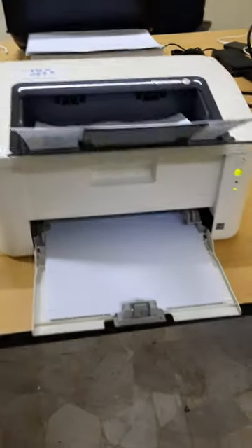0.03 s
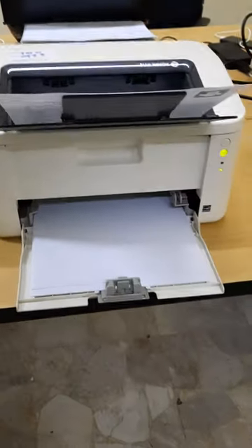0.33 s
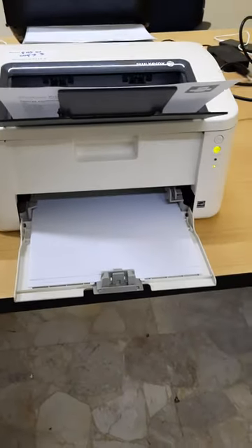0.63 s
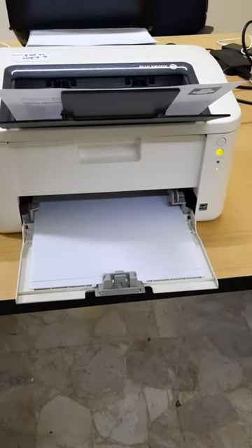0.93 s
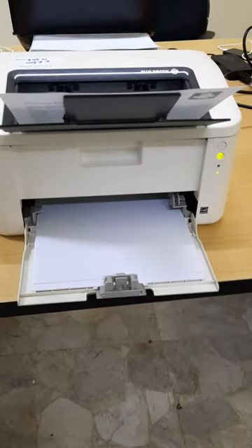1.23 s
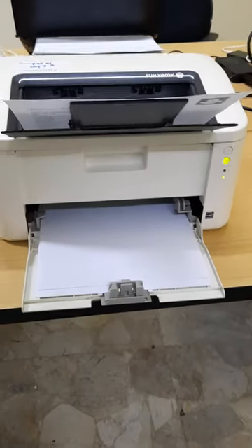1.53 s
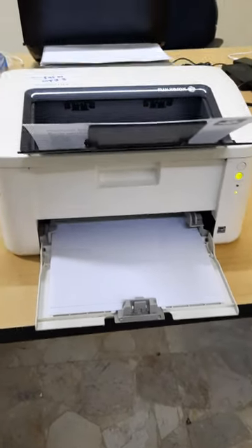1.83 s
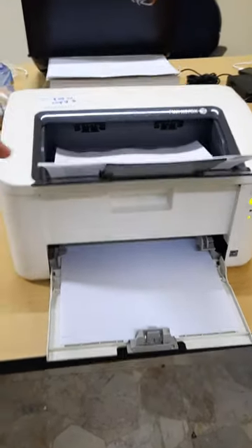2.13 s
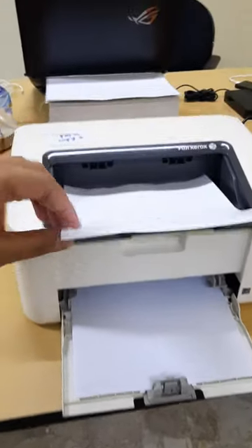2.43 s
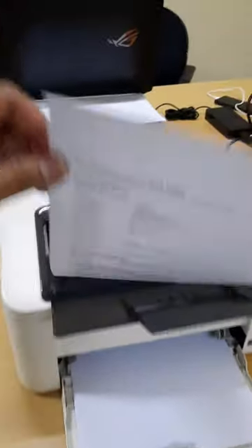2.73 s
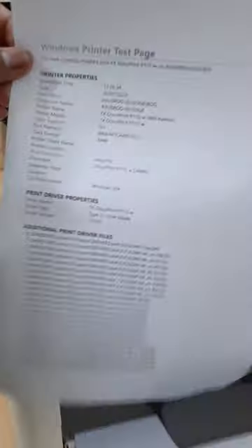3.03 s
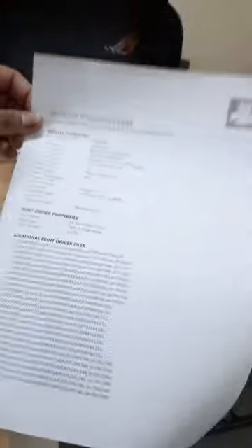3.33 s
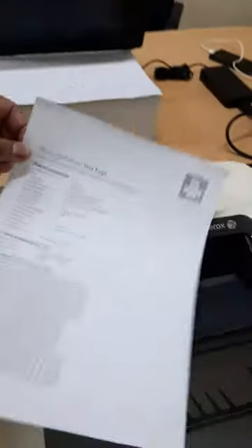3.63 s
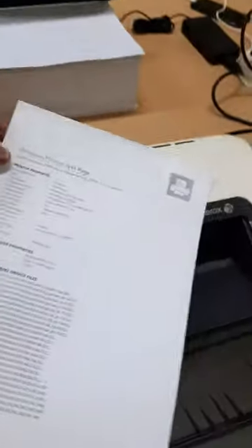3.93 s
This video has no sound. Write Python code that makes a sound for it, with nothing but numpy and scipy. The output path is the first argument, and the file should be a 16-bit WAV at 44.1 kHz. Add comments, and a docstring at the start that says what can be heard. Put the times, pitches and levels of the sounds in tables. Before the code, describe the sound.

A printer motor whines down, then a sheet of paper slides out and rustles.

```python
"""A small room, a stereo pair of microphones by a laser printer that has just finished, over a low rumble.
From the start its scanner motor coasts down, whining through the resonances of the plastic housing,
and a plastic part ticks. From 1.6 s an arm reaches in with soft swishes and the fingers grip the sheet
with a thin squeak. The paper hisses as it drags over the tray; from about 2.8 s it lifts clear,
buckling, flapping and crinkling, while the rumble grows."""
import sys
import numpy as np
from scipy import signal
from scipy.fft import rfft, irfft, next_fast_len
from scipy.io import wavfile
from scipy.ndimage import uniform_filter1d, map_coordinates

SR = 44100
rng = np.random.default_rng(int(sys.argv[2]) if len(sys.argv) > 2 else 0)


def unload_audio(sound):
    """Save the sound as a 16-bit wav file, at the path given as the first command line argument."""
    columns = np.transpose(np.atleast_2d(sound))
    # keep every value between -1 and 1, then stretch to whole-number steps
    steps = np.round(np.clip(columns, -1, 1) * 32767)
    wavfile.write(sys.argv[1], SR, steps.astype(np.int16))


N = 176400


def amp(db):
    """Decibels to gain."""
    return 10 ** (np.asarray(db) / 20)


def unit(x):
    """Scale to rms 1."""
    return x / np.sqrt(np.mean(x ** 2) + 1e-20)


def along(points, hz):
    """Read (freq_hz, value) points on a log frequency axis."""
    freqs, values = np.transpose(points)
    return np.interp(np.log(hz + 1), np.log(freqs + 1), values)


def clock():
    """Time of every sample in seconds."""
    return np.arange(N) / SR


def curves(rows):
    """One value per sample for each column after the time."""
    times, *columns = np.transpose(rows)
    return [np.interp(clock(), times, column) for column in columns]


def wobble(knots_per_s):
    """A smooth random curve."""
    return map_coordinates(rng.standard_normal(N // 8), [clock() * knots_per_s], mode="wrap")


def filtered(x, response):
    """Shape x by a gain that depends on frequency."""
    size = next_fast_len(N + SR // 4)
    return irfft(rfft(x, size) * response(np.fft.rfftfreq(size, 1 / SR)), size)[..., :N]


def pan(db):
    """Left and right gains; positive db leans left."""
    return amp(np.array([[.5], [-.5]]) * db)


def colour(points, tilt_db=0):
    """A spectrum in dB, tilted by so much per octave."""
    return lambda hz: along(points, hz) + tilt_db * np.log2(hz + 1)


def tone(hz):
    """A sine that follows a pitch curve."""
    return np.sin(2 * np.pi * (np.cumsum(hz) / SR + rng.random()))


def burst(start_s, rise_s, decay_s):
    """An envelope of peak 1 that rises and dies away."""
    age = np.maximum(clock() - start_s, 0)
    envelope = (1 - np.exp(-(age / rise_s) ** 2)) * np.exp(-age / decay_s)
    return envelope / envelope.max()


# How alike noise is at the two microphones: freq_hz, correlation
MIC_LIKENESS = [(200, 0.86), (400, 0.79), (1000, 0.38), (2500, 0.043), (12000, 0.024)]


def rush(colour_db, grain_share=0, grains_per_s=4000):
    """Stereo noise of rms 1, wide in the treble; a share of its power comes in separate grains."""
    smooth = rng.standard_normal((2, N))
    grains = unit(rng.standard_normal((2, N)) * (rng.random(N) < grains_per_s / SR))
    noise = np.sqrt(1 - grain_share) * smooth + np.sqrt(grain_share) * grains
    spread = lambda hz: np.arccos(along(MIC_LIKENESS, hz)) / 2
    mid, side = filtered(noise, lambda hz: amp(colour_db(hz)) * [np.cos(spread(hz)), np.sin(spread(hz))])
    return unit(np.array([mid + side, mid - side]))


# Spectra of the room's rumble, a deep swell and faint hiss: freq_hz, level_db
RUMBLE_SPECTRUM = [(25, -45), (38, -16), (51, -1), (64, -6.5), (125, -12.5), (155, -8), (230, -11),
                   (345, -7.5), (430, -18.5), (560, -29), (1000, -55)]
SWELL_SPECTRUM = [(25, -37), (50, 4.5), (150, -8), (400, -44.5)]
HISS_SPECTRUM = [(400, 0), (800, 4), (1600, -3.5), (2300, 1), (3800, -18), (6500, -13.5), (8400, -5.5),
                 (9500, -32), (15500, -19)]
# Course of the rumble and of the drone: time_s, level_db
RUMBLE_LEVELS = [(0, -58), (1.4, -61), (1.7, -59.5), (2.3, -54), (3.4, -55), (4, -51)]
DRONE_LEVELS = [(0, -71.5), (1.9, -65.5), (2.15, -57.5), (2.4, -50), (2.52, -55), (3.05, -60.5),
                (3.35, -53.5), (3.56, -59.5), (3.7, -47.5), (3.95, -47.5), (4, -48)]


def room_tone(drone_hz=102.8, swell_s=2, swell_width_s=0.35):
    """All around the microphones: rumble with one deep swell, a wavering drone and faint hiss."""
    rumble = rush(colour(RUMBLE_SPECTRUM)) * amp(curves(RUMBLE_LEVELS)[0] + 2.47 * wobble(12))
    swell_gain = amp(-59.5) * np.exp(-((clock() - swell_s) / swell_width_s) ** 2)
    swell = swell_gain * rush(colour(SWELL_SPECTRUM))
    drone = tone(drone_hz + 4 * wobble(20)) * amp(curves(DRONE_LEVELS)[0] + 1.03 * wobble(35))
    return rumble + swell + drone + amp(-77) * rush(colour(HISS_SPECTRUM))


# Air stirred by the rotor: freq_hz, level_db
AIR_SPECTRUM = [(290, -32), (520, -4), (850, -2), (2700, -11.5), (4300, -13), (5900, -17), (11000, -18.5),
                (15500, -24.5)]
# Housing resonances that colour the air: centre_hz, width_hz, gain_db
AIR_RESONANCES = [(1760, 390, 12.5), (2320, 140, 9.5), (3256, 560, 17.5), (5100, 410, 13.5),
                  (6470, 400, 3.5), (7300, 610, 7.5), (8600, 740, 4.5), (11000, 1500, 5)]


def rotor_air(halvings, fall_db=25):
    """Stirred air heard through the plastic shell, losing fall_db per halving of speed."""
    shell_db = lambda hz: sum(db / (1 + (2 * (hz - centre) / width) ** 2)
                              for centre, width, db in AIR_RESONANCES)
    return rush(lambda hz: along(AIR_SPECTRUM, hz) + shell_db(hz)) * amp(-56.5 - fall_db * halvings)


# Rotor partials at full speed, ahead of the housing: speed_multiple, level_db
WHINE_PARTIALS = [(1, -57), (4, -64), (7, -78), (8, -71), (9, -80), (10, -72.5), (12, -70), (19, -75),
                  (24, -73)]
# Housing resonances that the whine glides through: centre_hz, gain_db
WHINE_RESONANCES = [(577, -1.5), (1730, 0), (3150, 4.5), (3630, 2.5), (6450, -8.5), (7800, -12),
                    (10900, -9), (12150, 3)]


def rotor_whine(speed_hz, halvings, fall_db=10, flicker_db=3.5, valley_db=-22):
    """Each multiple of the rotor's speed swells as it glides through a resonance of the housing."""
    whine = np.zeros((2, N))
    for multiple, db in WHINE_PARTIALS:
        gain = amp(db - fall_db * halvings + flicker_db * wobble(25.7))
        roughness = 1 + .45 * wobble(160)
        sway = pan(4 * wobble(5))
        whine += gain * roughness * sway * tone(multiple * speed_hz * (1 + .003 * wobble(150)))
    # the higher a resonance, the wider
    peaks = lambda hz: sum(amp(db) * np.exp(-((hz - centre) / (42 + .022 * centre)) ** 2)
                           for centre, db in WHINE_RESONANCES)
    return filtered(whine, lambda hz: amp(valley_db) + peaks(hz))


def motor(full_speed_hz=555, slowing_per_s=.39):
    """Inside the printer, drag slows the scanner's rotor; its air and whine fade with the speed."""
    speed_hz = full_speed_hz * np.exp(-slowing_per_s * clock())
    halvings = np.log2(full_speed_hz / speed_hz)
    return rotor_air(halvings) + rotor_whine(speed_hz, halvings)


# A plastic tick: freq_hz, level_db
TICK_SPECTRUM = [(200, -15), (800, -3), (1400, -9), (2250, 4), (2750, -20), (9000, -45)]


def tick():
    """One small plastic part settles inside the printer."""
    return amp(-46) * burst(start_s=.439, rise_s=0.00024, decay_s=0.0022) * rush(colour(TICK_SPECTRUM))


# Movements of the arm: centre_s, width_s, level_db, tilt_db_per_octave
SWISH_EVENTS = [(1.605, 0.12, -66.5, -0.5), (1.807, 0.14, -73.5, 8), (2.397, 0.11, -71.5, -4)]
# Their soft noise: freq_hz, level_db
SWISH_SPECTRUM = [(1800, -16), (2250, -1), (3350, -6), (4000, -12.5), (5400, -8.5), (6800, -13),
                  (8200, -9.5), (9800, -15), (12000, -14), (15000, -22)]


def swishes():
    """An arm reaches toward the tray in smooth swells of noise."""
    return sum(amp(db) * np.exp(-((clock() - centre) / width) ** 2) * rush(colour(SWISH_SPECTRUM, tilt))
               for centre, width, db, tilt in SWISH_EVENTS)


# Course of the finger squeak: time_s, pitch_hz, level_db
SQUEAK_PATH = [(2.28, 6500, -100), (2.38, 7660, -72.5), (2.44, 7960, -72.5), (2.48, 7500, -73),
               (2.56, 7500, -73), (2.64, 7550, -76), (2.73, 7760, -77), (2.8, 7550, -130)]
# Its partials: pitch_ratio, level_db
SQUEAK_PARTIALS = [(1, 0), (1.115, -7), (1.27, -15), (1.535, -5), (1.59, -6)]


def squeak(pitch_jitter=.011):
    """At the tray, fingers grip the sheet with a thin, rough squeak."""
    hz, db = curves(SQUEAK_PATH)
    partials = np.zeros(N)
    for ratio, partial_db in SQUEAK_PARTIALS:
        gain = amp(partial_db + 2.5 * wobble(77))
        partials += gain * tone(ratio * hz * (1 + pitch_jitter * wobble(1500)))
    return amp(db) * partials


# Course of the paper's friction: time_s, treble_db, mids_db
SLIDE_LEVELS = [(2.4, -120, -120), (2.48, -77.5, -74.5), (2.68, -55.5, -62), (2.74, -55, -51),
                (2.845, -46.5, -45.5), (2.885, -53, -73), (2.905, -63, -63), (2.94, -59.5, -50),
                (3.01, -67.5, -58.5), (3.043, -54, -54.5), (3.065, -62.5, -49), (3.155, -60.5, -48.5),
                (3.168, -50, -44.5), (3.262, -44, -41.5), (3.278, -66, -55), (3.312, -53, -59),
                (3.335, -77, -71), (3.44, -69.5, -61), (3.5, -64, -52), (3.598, -52, -49),
                (3.617, -42.5, -37), (3.63, -74, -43), (3.7, -65, -81), (3.735, -57.5, -50.5),
                (3.825, -57.5, -60), (3.93, -67.5, -70.5)]
# Its two bands: freq_hz, level_db
PAPER_TREBLE = [(1500, -42), (3500, 3.5), (5600, -4), (7000, -2), (8600, -3), (9800, -8.5), (12300, -2),
                (15500, -13.5)]
PAPER_MIDS = [(150, -12), (400, 1.5), (550, -9), (800, -7), (1500, -1), (2300, 0.5), (3200, -8.5),
              (4500, -15), (7000, -29)]
# Extra gain on the top of the treble band: time_s, gain_db
SHEEN_GAINS = [(2.6, 1.5), (2.85, 0), (3.15, -3), (3.25, -17), (3.5, -10)]
PAPER_GRAIN_SHARE = 0.55


def slide(sheen_hz=9170, lifted_s=2.81, lifting_s=0.17, chatter_db=2.5):
    """Paper drags over plastic in countless tiny slips: dense in the tray, chattering once lifted."""
    treble_db, mids_db = curves(SLIDE_LEVELS)
    treble = rush(colour(PAPER_TREBLE), PAPER_GRAIN_SHARE)
    sheen = filtered(treble, lambda hz: hz > sheen_hz)
    treble += sheen * (amp(curves(SHEEN_GAINS)[0]) - 1)
    mids = rush(colour(PAPER_MIDS), PAPER_GRAIN_SHARE)
    hiss = amp(treble_db) * treble + amp(mids_db) * mids
    free = np.clip((clock() - lifted_s) / lifting_s + .5, 0, 1)  # 0 in the tray, 1 in the air
    return (1 - free) * hiss + free * flex(hiss * amp(chatter_db * wobble(220)))


def flex(hiss, depth_db=3):
    """As the sheet bends its resonances come and go: patches of random gain in time and frequency."""
    spectra = signal.stft(hiss, nperseg=512)[2]
    patches = uniform_filter1d(rng.standard_normal(spectra.shape[1:]), size=5, axis=0)
    patches = uniform_filter1d(patches, size=7, axis=1)
    return signal.istft(spectra * amp(depth_db * unit(patches) - 2.5), nperseg=512)[1][:, :N]


# Flaps and bumps of the sheet: start_s, level_db, rise_s, decay_s, resonance_hz, pan_db
FLAP_EVENTS = [(2.497, -55, 0.0024, 0.041, 920, -4.5), (2.797, -36, 0.0087, 0.027, 1630, 1.5),
               (2.923, -55.5, 0.0015, 0.029, 2420, -20.5), (3.282, -41.5, 0.0063, 0.028, 570, 0),
               (3.367, -46.5, .001, 0.0024, 784, -8), (3.507, -33.5, 0.0022, 0.0089, 2830, 0.5),
               (3.623, -34, 0.024, 0.011, 1570, 1.5), (3.661, -41.5, 0.014, 0.043, 930, 3),
               (3.794, -33, 0.00081, 0.009, 3020, 2), (3.809, -37.5, 0.0078, 0.012, 900, 4.5)]
# Body of the sheet: freq_hz, level_db
SHEET_SPECTRUM = [(60, -16), (130, -2), (370, 5.5), (530, -3.5), (760, -0.5), (1450, -1), (1950, -6),
                  (2350, -8), (4300, -21), (5300, -37), (12000, -36.5)]


def flaps(ring_db=9, ring_octaves=0.42):
    """The sheet flaps before the microphones, each time a dull crackling burst around one resonance."""
    out = np.zeros((2, N))
    for start, db, rise, decay, ring_hz, pan_db in FLAP_EVENTS:
        ring = lambda hz: ring_db * np.exp(-(np.log2((hz + 1) / ring_hz) / ring_octaves) ** 2)
        body = rush(lambda hz: along(SHEET_SPECTRUM, hz) + ring(hz), grain_share=.35)
        out += amp(db) * pan(pan_db) * burst(start, rise, decay) * body
    return out


# The sheet buckling: start_s, level_db, pitch_hz, decay_s, pan_db
SNAP_EVENTS = [(2.8025, -37.5, 1500, 0.0021, -18), (2.8137, -39, 1465, 0.0024, -15),
               (2.92, -32, 1830, 0.001, -5), (3.507, -23.5, 1480, 0.0016, 4),
               (3.7961, -36, 2320, 0.0028, 4)]


def snaps(rise_s=.0016):
    """The sheet buckles, first right, then left of centre: a few cycles of ringing with a crack."""
    out = np.zeros((2, N))
    crack = amp(-16) * rush(colour(SHEET_SPECTRUM, tilt_db=3))
    for start, db, hz, decay, pan_db in SNAP_EVENTS:
        ring = np.sin(2 * np.pi * hz * (clock() - start))
        out += amp(db) * pan(pan_db) * burst(start, rise_s, decay) * (ring + crack)
    return out


# Creases giving way: start_s, level_db
CRINKLE_EVENTS = [(2.9194, -51.5), (3.022, -54), (3.165, -44.5), (3.257, -51), (3.5035, -47.5),
                  (3.613, -47), (3.796, -43), (3.825, -48.5)]


def crinkles():
    """Above the tray, small creases give way with short bright ticks."""
    envelope = sum(amp(db) * burst(start, rise_s=.0012, decay_s=.0025) for start, db in CRINKLE_EVENTS)
    return envelope * rush(colour(PAPER_TREBLE), PAPER_GRAIN_SHARE)


def room(hits, t60_s=0.24, gap_s=.003, low_cut_hz=500):
    """The short answer of the nearby desk and walls, weak in the bass."""
    t = np.arange(SR // 2) / SR
    tail = rng.standard_normal((2, len(t))) * amp(-60 * t / t60_s) * (t > gap_s)
    wet = signal.fftconvolve(hits, tail / np.linalg.norm(tail[0]), axes=1)[:, :N]
    return filtered(wet, lambda hz: hz / np.hypot(hz, low_cut_hz))


def scene():
    """Printer, hand and paper from beside the tray; only the short hits get the room's answer."""
    hits = tick() + flaps() + snaps() + crinkles()
    return room_tone() + motor() + swishes() + squeak() + slide() + hits + amp(-9.5) * room(hits)


# Balance of the microphone pair: freq_hz, left_minus_right_db
MIC_BALANCE = [(60, 1), (350, 1), (700, 4.5), (1290, -0.5), (2380, -6.5), (4400, 2), (8100, 6.5),
               (15000, 10.5)]


def record(dry, top_hz=15850):
    """The two microphones differ in colour; nothing is kept above top_hz."""
    return filtered(dry, lambda hz: pan(along(MIC_BALANCE, hz)) * (hz < top_hz))


dry = scene()
out = record(dry)
unload_audio(out)
```